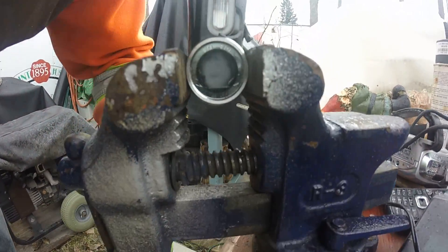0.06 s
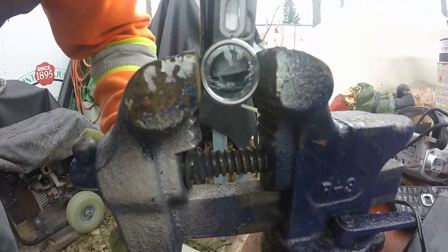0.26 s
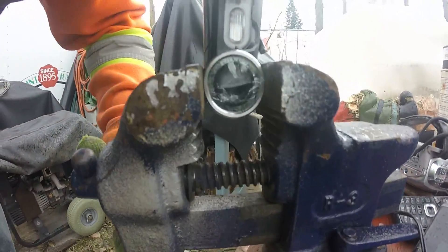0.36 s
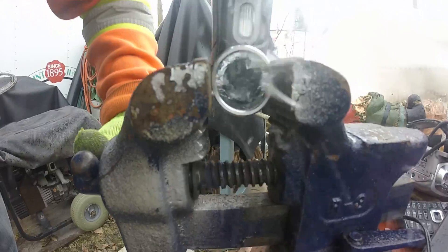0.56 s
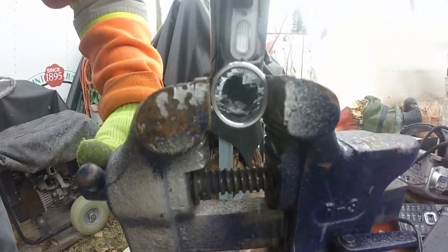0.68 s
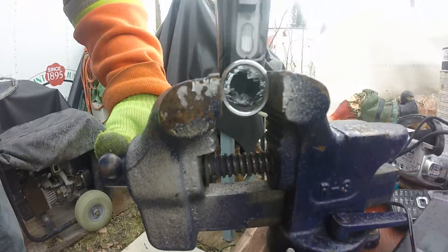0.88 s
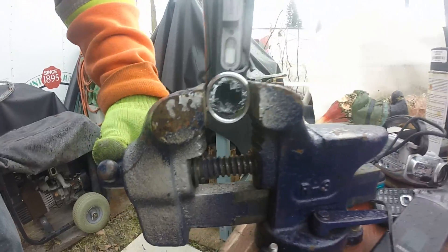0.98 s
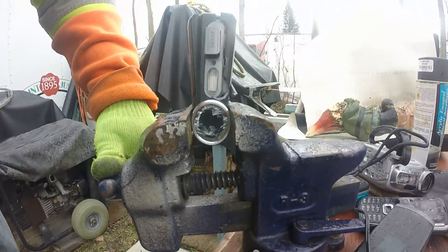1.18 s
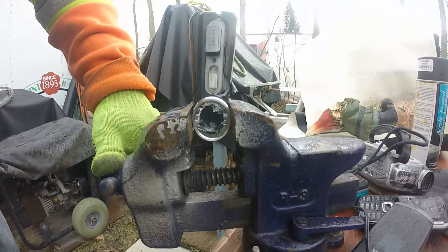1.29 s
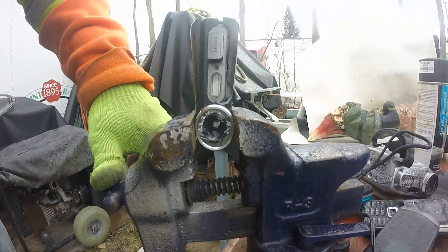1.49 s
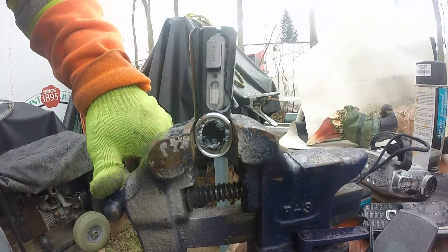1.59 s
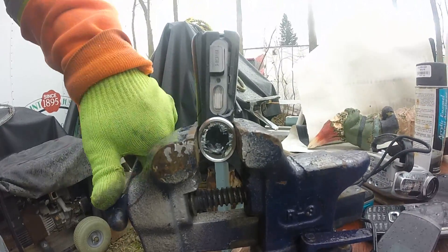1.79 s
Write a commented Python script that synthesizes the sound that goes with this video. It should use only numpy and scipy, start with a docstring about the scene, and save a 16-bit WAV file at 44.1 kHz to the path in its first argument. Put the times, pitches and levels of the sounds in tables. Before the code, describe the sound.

A camera lens barrel cracks in a bench vise, close up outdoors. Low hum and faint ticks lead to a loud burst of brittle cracks at 0.2-0.25 seconds, then scattered splinter ticks. A second dense burst hits at 0.6-0.65. The housing snaps with a hollow rattle at 0.84, dull screw knocks follow around 1.0-1.25, and a softer snap comes at 1.42. Faint crumbling trails off; hum dips after bursts.

```python
"""A low outdoor hum, then faint crumbling and ticks, and a camera lens barrel cracks in a bench vise close by.
Plastic and glass give way in bursts of very short cracks: shaped noise, resonances and a push on the jaws.
Later the housing snaps, twice clearly: a click, a rattle and a hollow ring of decaying modes. Splinters are
resonant ticks, the vise screw knocks dully, and a faint echo follows everything.
The recorder's gain control drops on loud bursts, taking the hum down with them, and recovers slowly."""
import sys
import numpy as np
from scipy import signal
from scipy.fft import rfft, irfft, next_fast_len
from scipy.io import wavfile
from scipy.ndimage import uniform_filter1d, map_coordinates

SR = 44100
rng = np.random.default_rng(int(sys.argv[2]) if len(sys.argv) > 2 else 0)


def master(y):
    """Save y as 16-bit WAV."""
    cut = np.clip(np.atleast_2d(y).T, -1, 1)
    pcm = np.round(cut * 32767)  # scale
    wavfile.write(sys.argv[1], SR, pcm.astype(np.int16))


N = 81585
T = np.arange(SR // 5) / SR  # time within one event, s
HZ = np.fft.rfftfreq(SR // 2, 1 / SR)  # frequencies of the event filter
TOP_HZ = 15800  # upper limit of the resonances and of the recorder


def amp(db):
    """Decibels to gain."""
    return 10 ** (np.asarray(db) / 20)


def fade(t60):
    """An exponential decay over one event, down 60 dB after t60 seconds."""
    return np.exp(-np.log(1000) * T / t60)


def burst(x):
    """Scale an event to the energy of 4 ms at rms 1."""
    return x / np.sqrt(np.sum(x ** 2) / (.004 * SR) + 1e-20)


def gain(points, hz):
    """Gain drawn through (Hz, dB) points on a log frequency axis."""
    point_hz, db = np.transpose(points)
    return amp(np.interp(np.log(hz + 1), np.log(point_hz), db))


def colour(x, points):
    """Filter one event by (Hz, dB) points, minimum phase so that nothing sounds before its onset."""
    size = SR // 2
    cepstrum = irfft(np.log(gain(points, HZ)), size)
    # folding the cepstrum onto positive time makes the filter causal
    cepstrum[1:size // 2] *= 2
    cepstrum[size // 2 + 1:] = 0
    response = np.exp(rfft(cepstrum))
    return irfft(rfft(x, size) * response, size)[:len(x)]


def resonate(x, hz, q):
    """One resonance."""
    return signal.lfilter(*signal.iirpeak(min(hz, TOP_HZ), max(q, 1), SR), x)


def resonate_twice(x, hz, q):
    """A sharp resonance followed by a broader one at the same pitch."""
    return resonate(resonate(x, hz, q), hz, q / 2)


def ring(modes, attack_s):
    """Decaying modes, each with a chance phase, swelling in together."""
    total = 0
    for hz, db, t60 in modes:
        total = total + amp(db) * fade(t60) * np.sin(2 * np.pi * (hz * T + rng.random()))
    return total * (1 - np.exp(-T / attack_s))


def tear(hold_s, t60):
    """A run of micro-fractures as noise: sudden, held while the crack travels, then dying."""
    return rng.standard_normal(len(T)) * np.exp(-np.log(1000) * np.maximum(T - hold_s, 0) / t60)


def add(track, s, x):
    """Mix an event into a track at s seconds."""
    part = track[round(s * SR):][:len(x)]
    part += x[:len(part)]


# Tone of the distant outdoor hum. Each row: frequency in Hz, relative level in dB.
YARD_COLOUR = [(25, -1.5), (90, -2.5), (150, -6), (210, -4), (420, -14), (720, -11), (1300, -25.5),
               (3500, -31.5), (5500, -38), (6600, -37.5), (8000, -42), (13000, -49), (15500, -56.5)]
YARD_DB, WAVER_DB, WAVER_HZ = -48.5, -0.15, 10  # hum level; depth of its waver; chance points per second


def yard():
    """Steady outdoor hum and hiss: coloured noise, wavering slightly in level."""
    size = next_fast_len(N + 8192)
    spectrum = rfft(rng.standard_normal(size)) * gain(YARD_COLOUR, np.fft.rfftfreq(size, 1 / SR))
    hum = irfft(spectrum, size)[:N]
    # a smooth curve through chance points
    points = rng.standard_normal(N * WAVER_HZ // SR + 4)
    waver = map_coordinates(points, [np.arange(N) * WAVER_HZ / SR])
    return amp(YARD_DB + WAVER_DB * waver) * hum / hum.std()


# Tone of the answer from nearby clutter. Each row: frequency in Hz, relative level in dB.
ECHO_TONE = [(100, -5), (700, 9), (3000, -5.5), (7000, -13), (15000, -12.5)]
ECHO_DB, ECHO_S = -39.5, 0.18  # level and t60


def echo(x):
    """A faint, short scatter from the things around the bench: a decaying noise tail that swells in."""
    swell = 1 - np.exp(-T / 0.012)
    tail = colour(tear(0, ECHO_S) * swell, ECHO_TONE)
    return amp(ECHO_DB) * signal.fftconvolve(x, tail / np.linalg.norm(tail))[:N]


# Fine crumbling of the strained plastic.
# Each row: start in seconds, length in seconds, grains per second, typical level in dB, typical pitch in Hz.
CRUMBLING_SPELLS = [(.165, 0.029, 177, -63.5, 9150), (0.219, 0.089, 194, -50.5, 7500),
                    (0.316, 0.22, 35, -66, 7100), (.61, .13, 120, -52, 4960), (0.952, .4, 80, -62, 3720),
                    (1.348, .45, 25, -69, 6000)]
CRUMB_Q, CRUMB_SPREAD, CRUMB_SCATTER_DB = 2.1, 0.38, 2.5  # sharpness; pitch spread (natural log); size scatter


def crumbs():
    """Faint resonant grains of noise, of chance time, pitch and size."""
    out = np.zeros(N)
    life = fade(t60=.004)[:SR // 100]
    for start, length, rate, db, typical_hz in CRUMBLING_SPELLS:
        for k, (slip, pitch, size) in enumerate(rng.standard_normal(size=(60, 3))):
            noise = life * rng.standard_normal(len(life))
            after = abs(k + .5 + .5 * slip) / rate  # loosely even spacing
            if after < length:
                hz = typical_hz * np.exp(CRUMB_SPREAD * pitch)
                grain = burst(resonate_twice(noise, hz, CRUMB_Q))
                add(out, start + after, amp(db + CRUMB_SCATTER_DB * size) * grain)
    return out


# Dull knocks of the vise screw taking up load. Each row: start in seconds, scrape level in dB, note level in dB.
SCREW_KNOCKS = [(.982, -51, -60), (1.006, -46.5, -48), (1.057, -56, -70), (1.092, -52, -36.5),
                (1.122, -46, -35.5), (1.134, -46, -53.5), (1.2352, -47, -62)]
# Tone of the scrape. Each row: frequency in Hz, relative level in dB.
SCRAPE_COLOUR = [(200, -23), (600, -2), (2000, 8), (3000, -2), (5000, -10), (9000, -19), (15000, -32)]
SCRAPE_S, NOTE_S, NOTE_HZ = 0.044, 0.023, 585  # t60 of the scrape; t60 and pitch of the note


def knocks():
    """The screw slips under load: a soft scrape and one damped note."""
    out = np.zeros(N)
    for s, scrape_db, note_db in SCREW_KNOCKS:
        scrape = burst(colour(tear(.002, SCRAPE_S), SCRAPE_COLOUR))
        note = burst(ring([(NOTE_HZ, 0, NOTE_S)], attack_s=0.0018))
        add(out, s, amp(scrape_db) * scrape + amp(note_db) * note)
    return out


# Splinters ticking. Each row: start in seconds, level in dB, pitch in Hz.
SPLINTER_TICKS = [(0.1772, -44, 11200), (0.1826, -45, 9200), (0.195, -51, 9800), (0.2012, -22.5, 9700),
                  (.2614, -26.5, 8960), (.2677, -37.5, 4200), (0.2792, -40, 8000), (0.2843, -30, 9900),
                  (0.2898, -39, 5600), (0.3595, -41, 3970), (0.3905, -38.5, 8790), (0.4558, -45.5, 6020),
                  (0.4869, -33, 9080), (.5330, -52.5, 4870), (0.5523, -47.5, 7550), (.5890, -46, 9170),
                  (.6262, -49, 4500), (0.68, -36, 5000), (0.682, -41, 5000), (0.6878, -37, 5700),
                  (0.725, -44.5, 7500), (0.9351, -50, 3306), (1.1589, -56, 4530), (1.1655, -50, 5070),
                  (1.2, -54, 5110), (1.2131, -55, 5040), (1.2784, -56.5, 5900), (1.3124, -58, 5500),
                  (1.3236, -56.5, 5500), (1.3820, -63, 6600), (1.3982, -54.5, 6500), (1.5346, -58.5, 6600),
                  (1.5748, -66.5, 8020), (1.6151, -59, 6630)]
# Tone of the tick's noise. Each row: frequency in Hz, relative level in dB.
TICK_NOISE_COLOUR = [(300, -27.5), (1500, -10), (3000, -5.5), (6000, -2), (10000, -3), (13000, -7.5),
                     (16000, -28)]
TICK_S, TICK_Q = 0.0041, 6.8  # t60 of noise and chip; sharpness of the chip's ring
TICK_NOISE_DB, TICK_RING_DB = -9, -2  # relative to the tick's level


def ticks():
    """Tiny chips part, each a speck of noise with its own resonant pitch."""
    out = np.zeros(N)
    for s, db, hz in SPLINTER_TICKS:
        chip = burst(resonate_twice(tear(0, TICK_S), hz, TICK_Q))
        noise = burst(colour(tear(0, TICK_S), TICK_NOISE_COLOUR))
        add(out, s, amp(db) * (amp(TICK_NOISE_DB) * noise + amp(TICK_RING_DB) * chip))
    return out


# Snaps of the housing; layer levels are relative to the snap's noise.
# Each row: start in seconds, level in dB, click pitch in Hz, click in dB, ring in dB, thud in dB.
HOUSING_SNAPS = [(0.8377, -14, 5395, 2, -8.5, -18.5), (1.3315, -48.5, 6450, 0.5, -18, -25),
                 (1.4220, -23.5, 6250, -3.5, -6, -8.5), (1.4941, -55.5, 6600, 6.5, -16, -23.5)]
# Tone of the snap and of the rattle. Each row: frequency in Hz, relative level in dB.
SNAP_NOISE_COLOUR = [(100, -14.5), (400, -19), (700, -16), (1200, -4), (1800, 2.5), (3000, -1.5),
                     (4000, -8.5), (6500, 0), (8200, -11.5), (10500, -13.5), (13000, -35), (16000, -18)]
# Modes of the hollow housing. Each row: frequency in Hz, relative level in dB, t60 in seconds.
HOUSING_MODES = [(971, 1, 0.05), (1008.5, -7.5, 0.051), (1655, -21, 0.024), (2024, 4, 0.02),
                 (2970, -10, .06), (4870, -12, 0.062), (6100, -21, 0.031)]
SNAP_S, RATTLE_S, RATTLE_DB = 0.017, 0.084, -10  # t60 of the snap; t60 and level of the parts rattling inside
THUD_HZ, THUD_S = 733.3, 0.046  # the body's dull answer: pitch and t60


def snaps():
    """A sharp click, a short rattle of parts, a dull thud, and the hollow housing ringing up behind them."""
    out = np.zeros(N)
    for s, db, hz, click_db, ring_db, thud_db in HOUSING_SNAPS:
        snap = burst(colour(tear(0.00044, SNAP_S), SNAP_NOISE_COLOUR))
        rattle = burst(colour(tear(0, RATTLE_S), SNAP_NOISE_COLOUR))
        click = burst(resonate(tear(0.00033, t60=0.0056), hz, q=4.5))
        thud = burst(resonate(resonate(tear(0, THUD_S), THUD_HZ, q=1), THUD_HZ, q=1))
        hollow = burst(ring(HOUSING_MODES, attack_s=0.006))
        noise = snap + amp(RATTLE_DB) * rattle
        tones = amp(thud_db) * thud + amp(click_db) * click + amp(ring_db) * hollow
        add(out, s, amp(db) * (noise + tones))
    return out


# Fractures; layer levels are relative to the splintering. Each row: start in seconds, level in dB, tearing time
# in seconds, shard pitch in Hz, shard in dB, barrel pitch in Hz, barrel in dB, jolt in dB.
FRACTURES = [(.2022, -2.5, .0009, 5610, -2.5, 700, -8, -33.5),
             (0.2063, -12, .002, 3410, -2, 780, -8.5, -24.5),
             (0.2097, -6.5, 0.0011, 5580, 1, 780, -8.5, -25.5),
             (0.2112, 3.5, .0019, 3340, -0.5, 800, -7.5, -34),
             (0.2223, -26.5, 0.00078, 3190, -3.5, 750, -11, -28.5),
             (0.2444, -1, .0014, 5477, 5.5, 1299, -10, -7.5),
             (0.599, -18.5, 0.0016, 5580, -1.5, 750, -8, -15.5),
             (.6020, -9, 0.0018, 5420, 3.5, 750, -10, -15), (0.6042, 1, .002, 3480, 1, 750, 1.5, -9),
             (0.6364, -22.5, 0.0018, 3370, -8.5, 850, -13.5, -28.5),
             (.6408, -22.5, 0.0014, 5400, 7.5, 850, -13.5, -29.5),
             (.6429, -6.5, .0004, 5420, 4.5, 880, -19, -21.5),
             (0.6457, 1.5, 0.0012, 2670, -7.5, 920, -11, -18),
             (0.6524, -14, .0003, 3500, -5, 880, -13, -39)]
# Tone of the splintering. Each row: frequency in Hz, relative level in dB.
SPLINTER_COLOUR = [(100, -25), (520, -15), (1000, -6.5), (1800, -3.5), (2600, -4), (4000, -3.5),
                   (5800, -2.5), (7800, -7), (9500, -6), (13000, -11), (15000, -12.5), (16500, -28)]
# Ringing of the lens mount after a crack. Each row: frequency in Hz, relative level in dB, t60 in seconds.
MOUNT_MODES = [(3250, -28, 0.05), (3510, -29.5, 0.034), (5360, -32, .02), (2430, -38, 0.081)]
RELEASE_S, SHARD_Q, BARREL_Q = 0.0087, 8, 2.4  # t60 of the splintering; sharpness of the resonances
JOLT_STRETCH = 1.5  # length of the push on the jaws, in tearing times


def jolt(hold_s):
    """The push on the jaws: one smooth low pulse, high-passed so that it settles back to rest."""
    pulse = np.sin(np.pi * np.minimum(T / (JOLT_STRETCH * hold_s), 1)) ** 2
    return burst(signal.lfilter(*signal.butter(1, 35, 'high', fs=SR), pulse))


def cracks():
    """Each fracture splinters, rings its shard, the barrel and the mount, and jolts the jaws."""
    out = np.zeros(N)
    for s, db, hold, shard_hz, shard_db, barrel_hz, barrel_db, jolt_db in FRACTURES:
        splinter = burst(colour(tear(hold, RELEASE_S), SPLINTER_COLOUR))
        shard = burst(resonate_twice(tear(hold, t60=.003), shard_hz, SHARD_Q))
        barrel = burst(resonate_twice(tear(hold, t60=0.0042), barrel_hz, BARREL_Q))
        mount = ring(MOUNT_MODES, attack_s=.001)
        body = amp(shard_db) * shard + amp(barrel_db) * barrel + mount
        add(out, s, amp(db) * (splinter + body + amp(jolt_db) * jolt(hold)))
    return out


def scene():
    """The yard, and the breaking camera with its echo."""
    near = crumbs() + knocks() + ticks() + snaps() + cracks()
    return (yard() + echo(near) + near)[None]


THRESHOLD_DB, RECOVER_DB_PER_S, SENSE_S = -11.5, 20, 0.0036  # gain control; SENSE_S is its averaging time


def record(dry):
    """Gain control drops at once and recovers slowly; peaks are rounded off; the top is cut."""
    t = np.arange(N) / SR
    power = uniform_filter1d(dry[0] ** 2, max(int(SENSE_S * SR), 2))
    level_db = 10 * np.log10(np.abs(power) + 1e-12)
    over_db = np.maximum(level_db - THRESHOLD_DB, 0)
    # a running peak that falls back at the recovery rate
    cut_db = np.maximum.accumulate(over_db + RECOVER_DB_PER_S * t) - RECOVER_DB_PER_S * t
    held = dry * amp(-uniform_filter1d(cut_db, size=44))  # gain smoothed over 1 ms
    rounded = held / (1 + held ** 8) ** (1 / 8)
    size = next_fast_len(N + 8192)
    top_cut = 1 / (1 + (np.fft.rfftfreq(size, 1 / SR) / TOP_HZ) ** 120)
    return irfft(rfft(rounded, size) * top_cut, size)[:, :N]


dry = scene()
out = record(dry)
master(out)
```